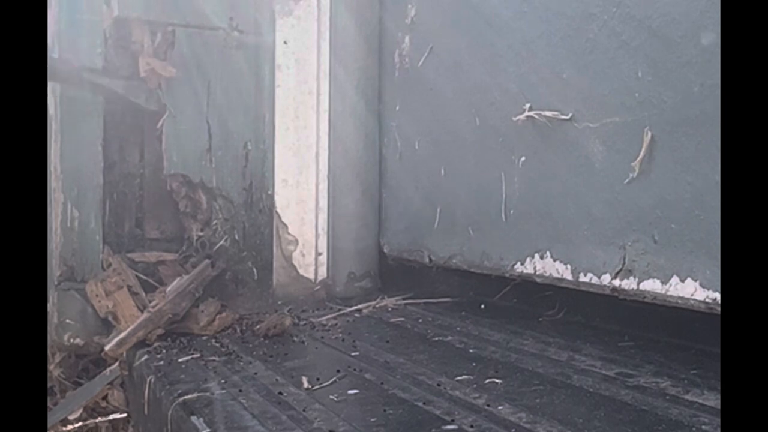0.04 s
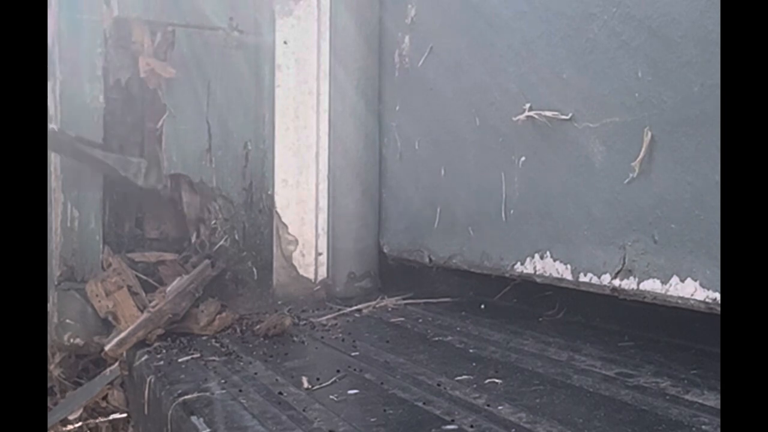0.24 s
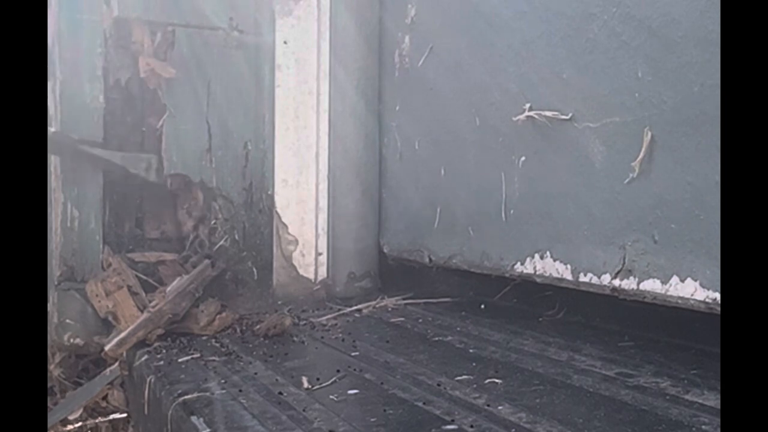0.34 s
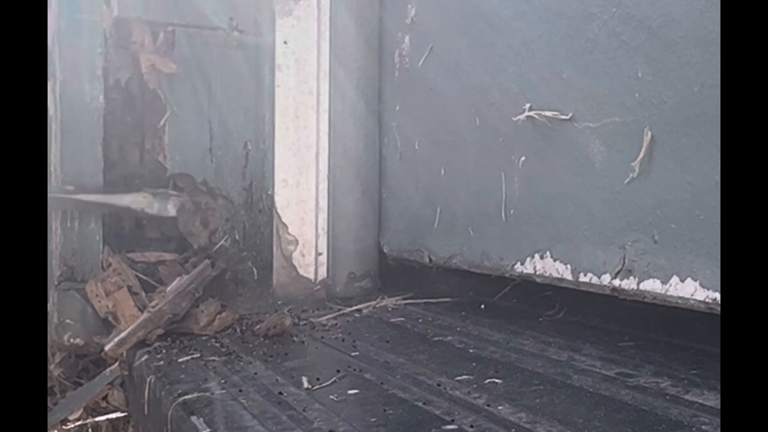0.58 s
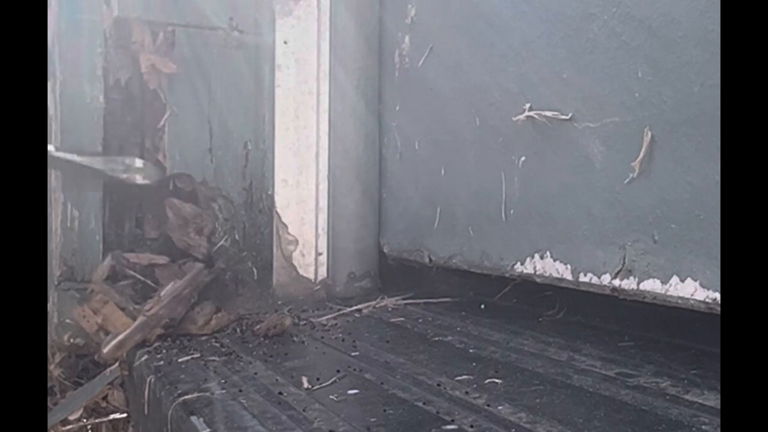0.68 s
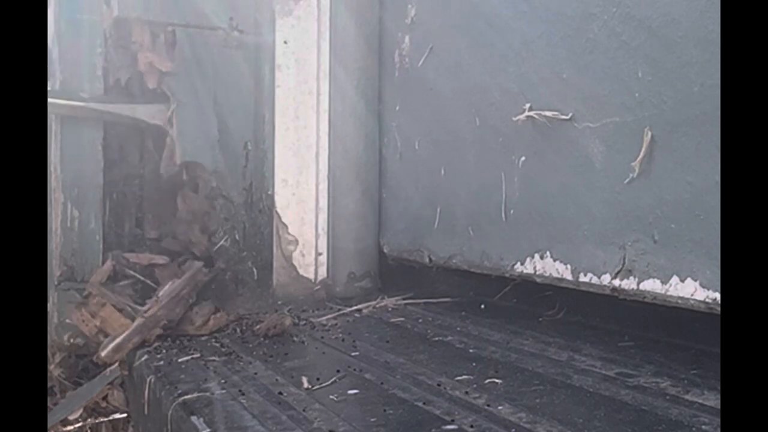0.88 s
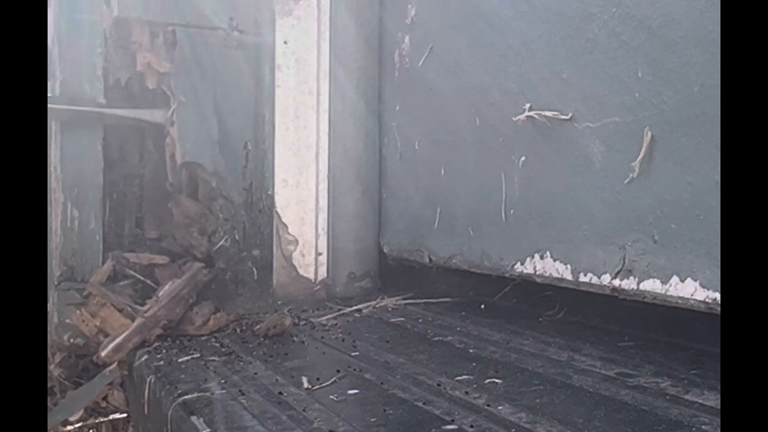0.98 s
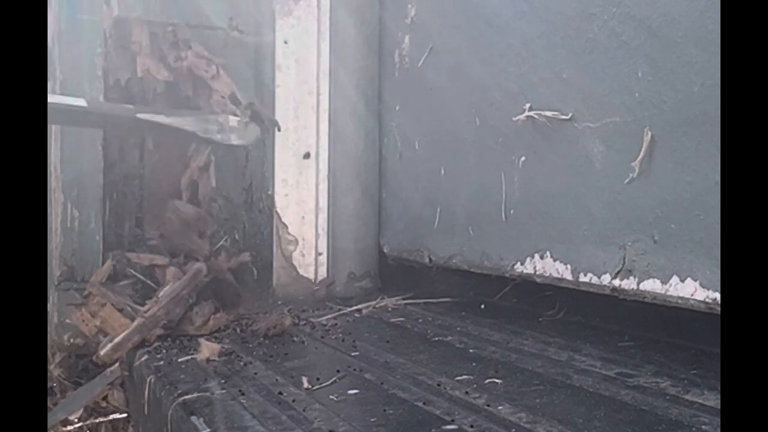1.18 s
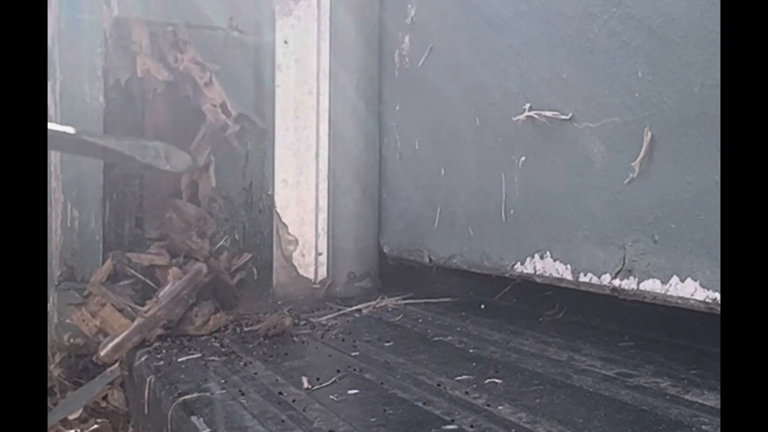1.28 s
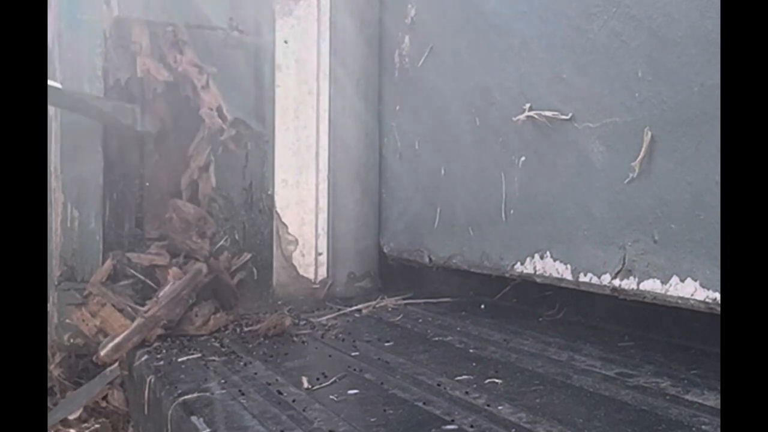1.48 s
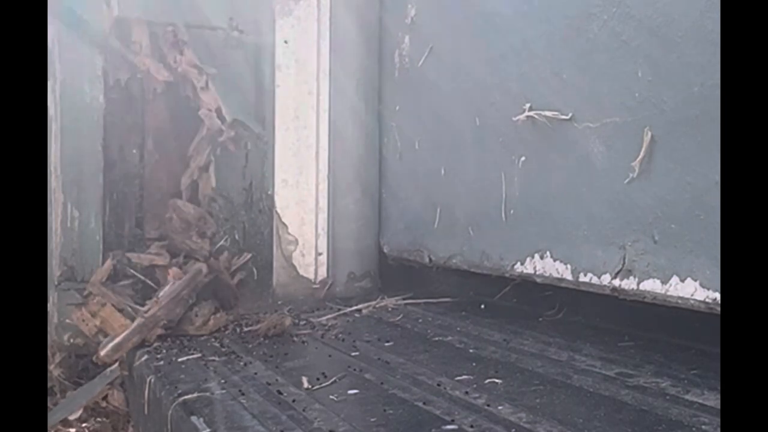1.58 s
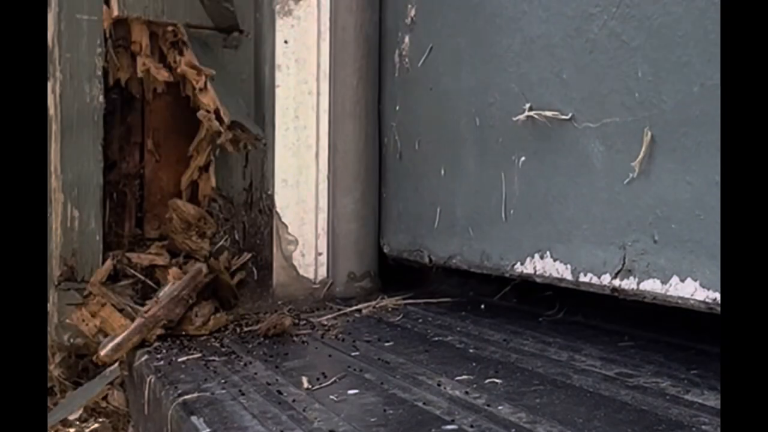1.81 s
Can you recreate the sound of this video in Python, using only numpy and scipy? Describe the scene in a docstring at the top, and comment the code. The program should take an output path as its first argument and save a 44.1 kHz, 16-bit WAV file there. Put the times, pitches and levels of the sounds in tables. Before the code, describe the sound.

A steel tool scrapes and crunches through rotten wood, close up. Light rasping strokes and small ticks build to dense, brittle snaps, loudest near 0.5 seconds. More scraping brings bursts of cracks around 0.85 and 1.1 seconds, then loose chips tap down. After a lull, one soft snap and two low knocks come at 1.8 seconds. A very short porch echo and a faint, steady outdoor rumble continue throughout.

```python
"""A flat steel tool digs into a rotten door frame on a porch, close up, over a low outdoor rumble.
Light strokes rasp over soft fibres first; brittle ones snap, densest and loudest near 0.5 s.
More scraping brings bursts of cracks near 0.85 and 1.08 s, then loose chips knock on the sill.
After a lull, one last snap and two low knocks at 1.8 s.
Door and floor return a short slap throughout."""
import sys
import numpy as np
from scipy import signal
from scipy.fft import rfft, irfft
from scipy.io import wavfile

SR = 44100
rng = np.random.default_rng(int(sys.argv[2]) if len(sys.argv) > 2 else 0)


def to_wav(s):
    """Save 16-bit WAV."""
    ch = np.atleast_2d(s).T  # columns
    pcm = np.round(np.clip(ch, -1, 1) * 32767)  # PCM
    wavfile.write(sys.argv[1], SR, pcm.astype(np.int16))


N = 81585

# wood registers thud, knock, crunch, rasp, fizz: f_low/Hz, f_high/Hz, ring/s, echo/dB, side/dB
WOOD_BANDS = [(122, 1004, 0.0019, -9.5, -25), (980, 2860, 0.00076, -18, -10.5),
              (2830, 5420, 0.00039, -24, -24.5), (4790, 8480, .0001, -25.5, -13.5),
              (8960, 26000, 0.0002, -22, -12)]
# frame and blade resonances: f/Hz, width/Hz, level/dB
BODY_MODES = [(143, 61, 5.5), (401, 101, 9), (640, 180, 4.5), (825.5, 110, 6), (1403, 192, 11.5),
              (1918, 370, 6), (2330, 460, 1), (3582, 420, 9.5), (4500, 526, 8.5), (5664, 520, 3),
              (6554, 700, 3), (8370, 910, -0.5), (10150, 3500, -4), (13960, 2100, 1.5), (15100, 1300, 0)]
# fibre snaps: t/s, 5 x register level/dB, tear/ms
SNAPS = [(0.0698, -82, -40.5, -36.5, -64, -43, 3.9), (0.1937, -55, -50, -38.5, -63, -42, .33),
         (0.2009, -55, -44, -38, -57, -41, .43), (0.203, -43, -45, -43, -36.5, -34.5, 1),
         (0.2139, -39.5, -30, -46, -48, -46, 0.51), (.3211, -44, -50, -55, -73, -62, 0.49),
         (0.3859, -39, -44.5, -64, -48, -38.5, 0.21), (.403, -45, -44, -56, -44.5, -34, 2.5),
         (0.4116, -43, -37, -35.5, -32, -29.5, 1.8), (.4211, -50, -48, -39, -38, -38, .3),
         (0.4259, -47, -35.5, -26, -34.5, -32, 2.4), (0.4378, -38, -43.5, -39, -38, -26, 0.28),
         (0.4447, -23.5, -36.5, -27.5, -26, -23.5, 0.68), (0.4531, -38.5, -47.5, -42, -35, -33.5, 0.66),
         (0.4661, -31.5, -30, -30, -22.5, -18, 0.61), (0.4726, -41, -37, -39, -35.5, -33.5, .25),
         (.477, -38.5, -38, -33.5, -32, -34.5, .3), (0.4905, -36.5, -35, -28.5, -24.5, -19, 0.55),
         (0.5036, -32.5, -26, -15, -17.5, -18.5, 0.31), (0.5265, -41, -41, -38.5, -42.5, -46, 0.68),
         (.549, -31, -34.5, -23, -29.5, -18.5, .15), (0.6784, -35, -33.5, -39, -57, -43, 5.2),
         (.706, -41, -41, -37.5, -56, -49, 1.3), (.8162, -34, -27.5, -31, -26, -28.5, 1.7),
         (0.819, -25.5, -30.5, -36, -32.5, -30, 0.81), (0.8237, -30, -35.5, -44, -44, -43, .5),
         (0.8427, -41.5, -35, -42, -49, -47, 0.7), (0.8494, -27.5, -31, -43, -28.5, -31, 1.2),
         (0.8596, -29.5, -30, -35, -27, -36, 1.8), (0.8685, -44, -49, -44, -32, -34, 0.45),
         (0.8901, -28.5, -38.5, -31, -24.5, -22.5, 2), (.8956, -36, -29, -25.5, -25, -29.5, 1),
         (1.0634, -60, -53, -35.5, -27, -35, 0.83), (1.0715, -39.5, -45, -46, -26.5, -37, .4),
         (1.0731, -46, -41, -30, -30, -41, 0.62), (1.079, -35.5, -30.5, -23, -33, -36.5, 0.45),
         (1.0839, -37, -49, -23, -25.5, -40, .5), (1.0856, -50, -47, -28.5, -24, -49, .18),
         (1.1655, -49, -48, -49, -61, -48.5, .52), (1.1905, -45, -44, -43.5, -52, -40.5, 2.1),
         (1.2226, -70, -69, -67.5, -65, -52.5, 0.49), (1.7714, -42.5, -41, -53, -53.5, -43, .4)]
# blade strokes: t_start/s, t_end/s, rise/s, fall/s, 5 x register level/dB
BLADE_STROKES = [(0.068, .100, 0.016, 0.012, -65, -56.5, -53, -62, -62.5),
                 (0.171, 0.17, 0.0077, 0.0058, -49.5, -51.5, -47, -56, -63),
                 (0.2, 0.23, 0.0094, 0.0041, -47.5, -50.5, -52, -53.5, -58),
                 (0.278, 0.28, 0.024, 0.0088, -52, -50.5, -46.5, -53, -60),
                 (0.301, 0.32, 0.009, 0.024, -51, -56, -55, -60.5, -61.5),
                 (0.423, 0.48, 0.027, 0.021, -51, -52, -42, -46.5, -48),
                 (0.513, 0.507, 0.015, 0.0046, -42, -32, -38.5, -31, -46.5),
                 (0.587, .620, 0.022, 0.026, -46.5, -47.5, -44.5, -50.5, -53.5),
                 (0.644, 0.69, 0.033, 0.031, -48.5, -50.5, -47, -55.5, -60.5),
                 (0.719, 0.73, 0.025, 0.016, -46.5, -48.5, -49.5, -51, -53),
                 (0.796, 0.82, 0.021, .010, -48, -55, -52, -53.5, -59),
                 (0.826, 0.9, 0.011, 0.012, -42.5, -43.5, -61, -46.5, -52),
                 (0.975, 1.031, 0.042, 0.0066, -49, -55, -53, -54.5, -61.5),
                 (1.067, 1.1115, 0.023, 0.023, -45, -46.5, -41, -39.5, -51.5),
                 (1.118, 1.173, 0.038, 0.096, -64, -66.5, -62, -65.5, -62.5)]
# chip landings: t/s, level/dB, f/Hz, decay/ms, click re modes/dB
CHIP_HITS = [(0.2136, -31, 1073, 1.3, -20), (0.3064, -41, 1480, 1.1, -11), (1.1215, -29, 1650, 1.6, -24),
             (1.1302, -27, 1878, 0.83, -10.5), (1.154, -38, 1770, 1.1, -22), (1.158, -38, 1660, 1.8, -16),
             (1.7745, -27.5, 439, 1.82, -33), (1.7885, -39, 342, 2.69, -24)]
# chip modes: frequency ratio, level/dB
CHIP_PARTIALS = [(.72, 0), (1, 5), (1.35, -0.5), (2.6, -9)]
# heavy breaks that ring the frame: t/s, level/dB
HEAVY_BREAKS = [(.215, -39), (.446, -39), (.505, -32.5)]
# firm timber behind the rot: f/Hz, level/dB, t60/s
TIMBER_MODES = [(816, -0.5, .04), (1296, -12, 0.043), (2200, -3.5, 0.028)]
# stereo image, left over right: f/Hz, level/dB
LEFT_GAIN = [(650, -1), (950, 3.5), (1500, 4.5), (2600, -.5), (4800, -1), (5300, 6), (5900, 4.5),
             (6600, -2), (11000, 0)]
# stereo image, left minus right: f/Hz, phase/rad
LEFT_PHASE = [(300, 0), (900, .2), (1900, -.75), (3100, -.1), (10000, .1), (10700, -.9), (13000, -1.3)]
# outdoor spectrum: f/Hz, relative density/dB
RUMBLE_SPECTRUM = [(25, -25), (70, -14), (105, 2), (250, 4), (400, -7.5), (600, -11), (1000, -24),
                   (2000, -37), (2900, -34), (4000, -44), (5300, -37.5), (6500, -47), (9000, -45),
                   (12000, -40.5), (15000, -42)]
# outdoor stereo width: f/Hz, side re mid/dB
RUMBLE_WIDTH = [(30, -5), (100, -42.5), (300, -30.5), (700, -4.5), (2000, 0), (12000, -6.5)]

SWELL_S, SWELL_DB = 0.0018, -18.5  # brief faint noise swell leading into each snap
FIRST_BREAK_DB, SNAP_RISE_S, FRACTURE_SPREAD_DB = 2.5, 0.0001, 2
GRAINS_PER_S, GRAIN_SPREAD_DB, GRAIN_CAP = 7400, 2.5, 5.1
RUB_DB, CHATTER_DB, CHATTER_HZ = -5.5, 2.5, 400
CONTACT_HZ = 4570  # soft wood dulls the click above this
PORCH_T60_S, PORCH_DELAY_S = 0.11, 0.004
RUMBLE_DB, CUTOFF_HZ = -50.5, 16400


def cracks(register, wood, ring_s, size=2048, lead=512):
    """Fibres break, then tear in an avalanche of tiny fractures; low registers last longer."""
    out, t = np.zeros(N), (np.arange(size) - lead) / SR
    after_s = np.maximum(t, 0)
    swell = from_db(SWELL_DB) * np.exp(-np.abs(t) / SWELL_S) * (t < ring_s)
    first_break = from_db(FIRST_BREAK_DB) * unit_hit(signal.unit_impulse(size, lead + int(ring_s * SR / 2)))
    attack = 1 - np.exp(-after_s / (SNAP_RISE_S + ring_s / 3))
    for at_s, *levels_db, tear_ms in SNAPS:
        noise, uneven = rng.standard_normal((2, size))
        fractures = noise * from_db(FRACTURE_SPREAD_DB * uneven)
        envelope = attack * np.exp(-after_s / (tear_ms / 1000 + ring_s))
        avalanche = unit_hit(fractures * (envelope / envelope.max() + swell))
        brittle = np.exp(-tear_ms)  # slow tears lack a clean first break
        snap = unit_hit(signal.fftconvolve(brittle * first_break + avalanche, wood))
        add(out, at_s + t[0], from_db(levels_db[register]) * snap)
    return out


def scrape(register, wood, force):
    """Friction drives the wood; strokes swell, hold and fade, 20 dB per rise or fall time."""
    t, power = np.arange(N) / SR, 0
    for start_s, end_s, rise_s, fall_s, *levels_db in BLADE_STROKES:
        away = np.maximum(start_s - t, 0) / rise_s + np.maximum(t - end_s, 0) / fall_s
        power += from_db(levels_db[register] - 20 * np.minimum(away, 10)) ** 2
    return np.sqrt(power) * rms_one(signal.fftconvolve(force, wood)[:N])


def friction():
    """Crumbs break at random over smooth rubbing while the blade sticks and slips."""
    sizes_db = GRAIN_SPREAD_DB * np.minimum(rng.exponential(1, N), GRAIN_CAP)
    signs = rng.choice([-1, 1], N)
    grains = rms_one(from_db(sizes_db) * signs * (rng.random(N) < GRAINS_PER_S / SR))
    rub = from_db(RUB_DB) * rng.standard_normal(N)
    return (grains + rub) * from_db(CHATTER_DB * drift(CHATTER_HZ))


def wood_response(size=2048):
    """Impulse response of frame and blade: resonators of alternating sign."""
    click, out = signal.unit_impulse(size), 0
    for k, (hz, width_hz, db) in enumerate(BODY_MODES):
        r = np.exp(-np.pi * width_hz / SR)
        mode = signal.lfilter([1, 0, -1], [1, -2 * r * np.cos(2 * np.pi * hz / SR), r * r], click)
        out += (-1) ** k * from_db(db) * (1 - r * r) / 2 * mode
    return out


def chips(size=2048):
    """Loose pieces land: a dull contact click and heavily damped modes."""
    out, t = np.zeros(N), np.arange(size) / SR
    lowpass = signal.butter(2, CONTACT_HZ, fs=SR, output="sos")
    contact = unit_hit(signal.sosfilt(lowpass, band(wood_response(), low_hz=2490, high_hz=12000)))
    for at_s, db, hz, decay_ms, click_db in CHIP_HITS:
        modes = sum(from_db(mode_db) * np.sin(2 * np.pi * (hz * ratio * t + rng.random()))
                    for ratio, mode_db in CHIP_PARTIALS)
        envelope = np.exp(-1000 * t / decay_ms) * (1 - np.exp(-2 * hz * t)) ** 2
        add(out, at_s, from_db(db) * (unit_hit(modes * envelope) + from_db(click_db) * contact))
    return out


def frame_ring(size=4096):
    """Heavy breaks leave hollow modes ringing in the firm timber."""
    out, t = np.zeros(N), np.arange(size) / SR
    ring = sum(from_db(db - 60 * t / t60_s) * np.sin(2 * np.pi * hz * t) for hz, db, t60_s in TIMBER_MODES)
    for at_s, db in HEAVY_BREAKS:
        add(out, at_s, from_db(db) * ring)
    return out


def porch(x, size=12000):
    """Short diffuse slap from door and floor, different at each ear."""
    t = np.arange(size) / SR
    mid, side = rng.standard_normal((2, size)) * from_db(-60 * t / PORCH_T60_S) * (t > PORCH_DELAY_S)
    tails = mid + side / 2, mid - side / 2
    return np.array([signal.fftconvolve(x, tail / np.linalg.norm(tail))[:N] for tail in tails])


def stereo_image(x):
    """Left/right level and phase by frequency."""
    tilt = from_db(at_bins(LEFT_GAIN) / 2) * np.exp(1j * at_bins(LEFT_PHASE) / 2)
    return irfft(rfft(x) * np.array([tilt, 1 / tilt]), N)


def outdoors():
    """Steady distant rumble with faint hiss."""
    mid, side = rfft(rng.standard_normal((2, N))) * from_db(at_bins(RUMBLE_SPECTRUM))
    side *= from_db(at_bins(RUMBLE_WIDTH))
    return from_db(RUMBLE_DB) * rms_one(irfft([mid + side, mid - side], N))


def from_db(db):
    """dB to gain."""
    return 10 ** (np.asarray(db) / 20)


def rms_one(x):
    """Scale to unit rms."""
    return x / np.sqrt(np.mean(x ** 2) + 1e-20)


def unit_hit(x):
    """Scale to the energy of 1 ms at unit rms."""
    return x / np.sqrt(np.sum(x ** 2) * 1000 / SR + 1e-20)


def at_bins(points):
    """Spectrum table at every FFT bin, log-f interpolated."""
    hz, value = np.transpose(points)
    return np.interp(np.log(np.fft.rfftfreq(N, 1 / SR) + 1), np.log(hz), value)


def add(out, at_s, sound):
    """Mix in a short sound."""
    i = int(at_s * SR)
    out[i:i + len(sound)] += sound[:len(out) - i]


def drift(corner_hz):
    """Low-passed noise, unit rms."""
    r = np.exp(-2 * np.pi * corner_hz / SR)
    return rms_one(signal.lfilter([1], [1, -2 * r, r * r], rng.standard_normal(2 * N))[N:])


def band(x, low_hz, high_hz):
    """Band-pass."""
    edges_hz = [low_hz, min(high_hz, SR / 2 - 1000)]
    return signal.sosfilt(signal.butter(3, edges_hz, btype="band", fs=SR, output="sos"), x)


def scene():
    """Cracks, scraping, chips and frame ring with their echo, over the rumble."""
    forces = friction(), friction()
    direct = chips() + frame_ring()
    echo = from_db(-19) * porch(direct)
    for register, (low_hz, high_hz, ring_s, echo_db, side_db) in enumerate(WOOD_BANDS):
        wood = band(wood_response(), low_hz, high_hz)
        # the break spreads across the wood, so the ears differ
        mid, side = (cracks(register, wood, ring_s) + scrape(register, wood, force) for force in forces)
        direct = direct + mid + from_db(side_db) * np.array([side, -side])
        echo += from_db(echo_db) * porch(mid)
    return stereo_image(direct + echo) + outdoors()


def record(dry):
    """Steep low-pass."""
    return signal.sosfilt(signal.ellip(10, .2, 80, CUTOFF_HZ, fs=SR, output="sos"), dry)


dry = scene()
out = record(dry)
to_wav(out)
```